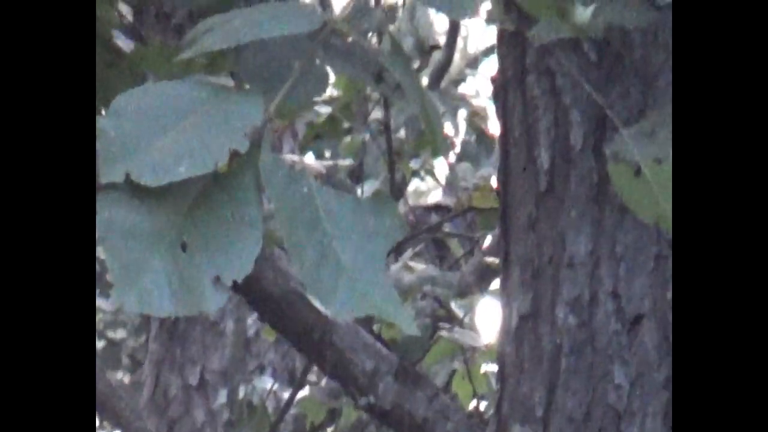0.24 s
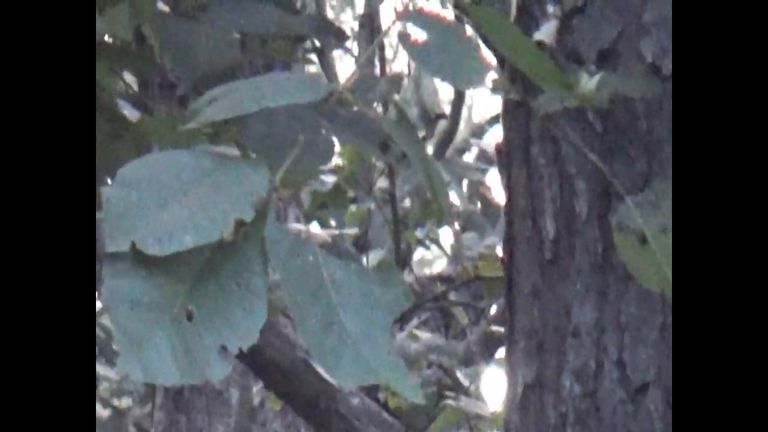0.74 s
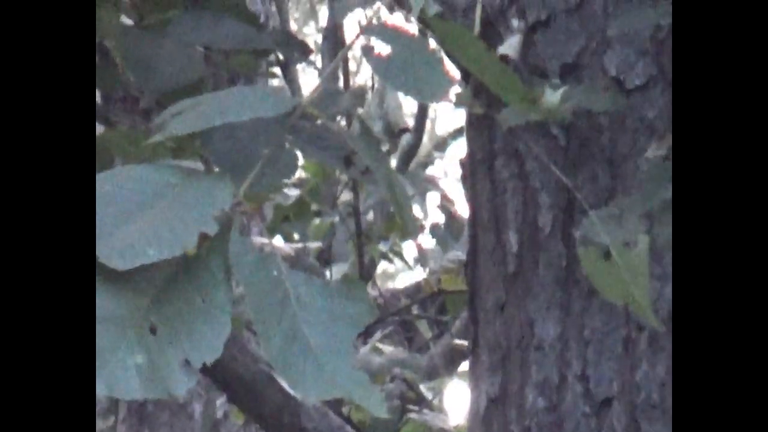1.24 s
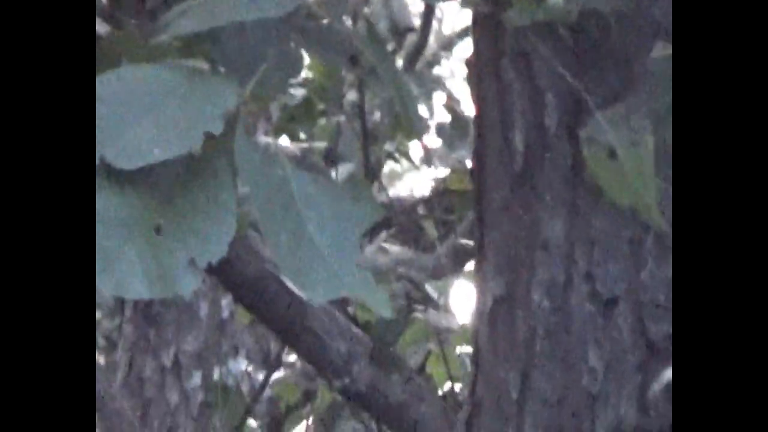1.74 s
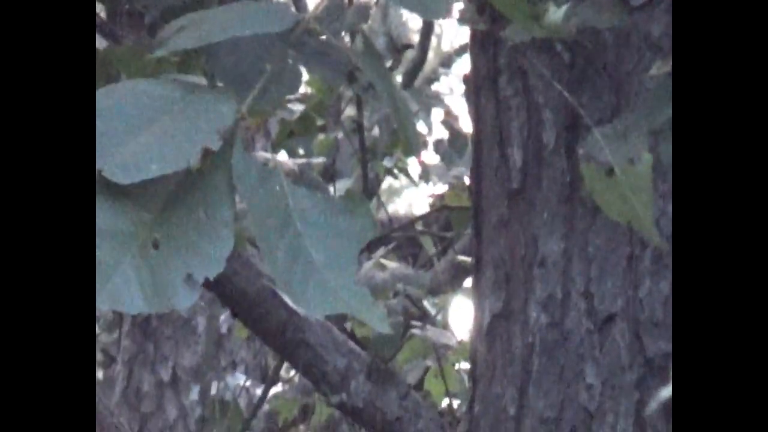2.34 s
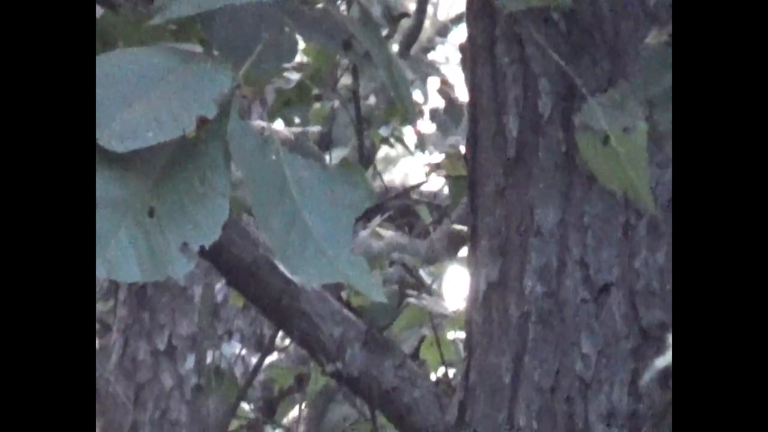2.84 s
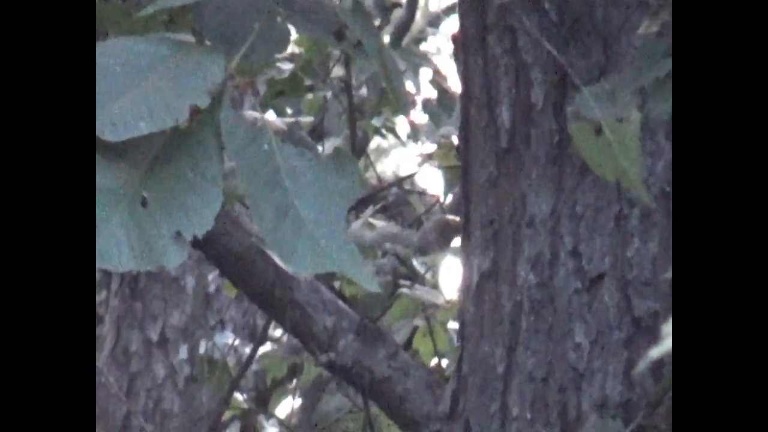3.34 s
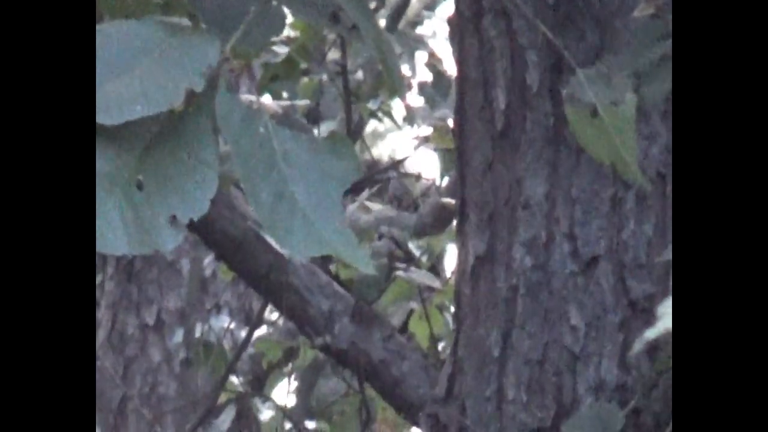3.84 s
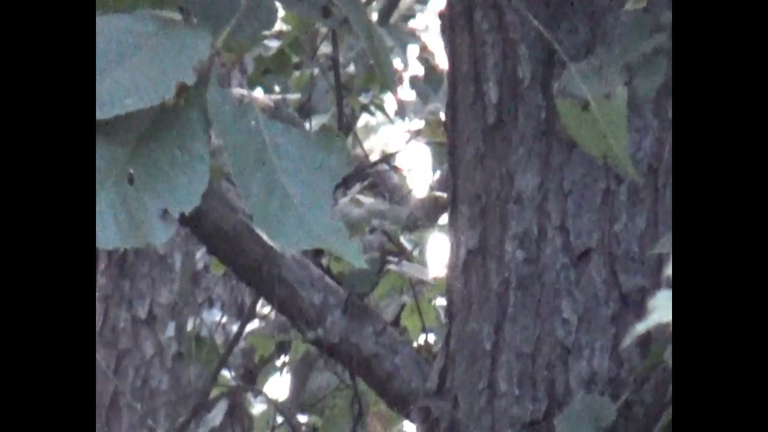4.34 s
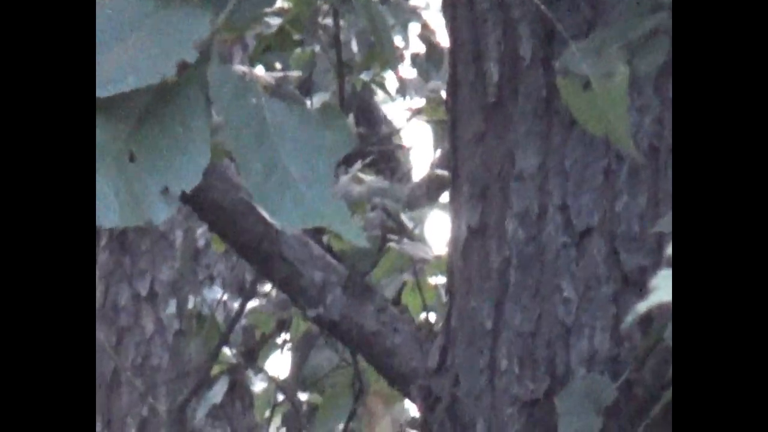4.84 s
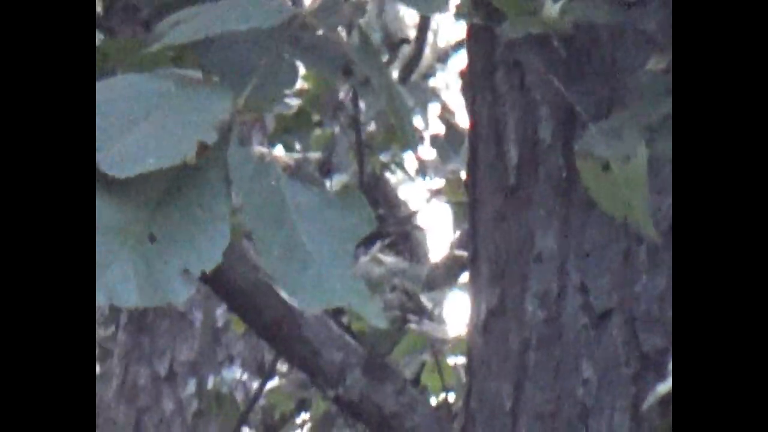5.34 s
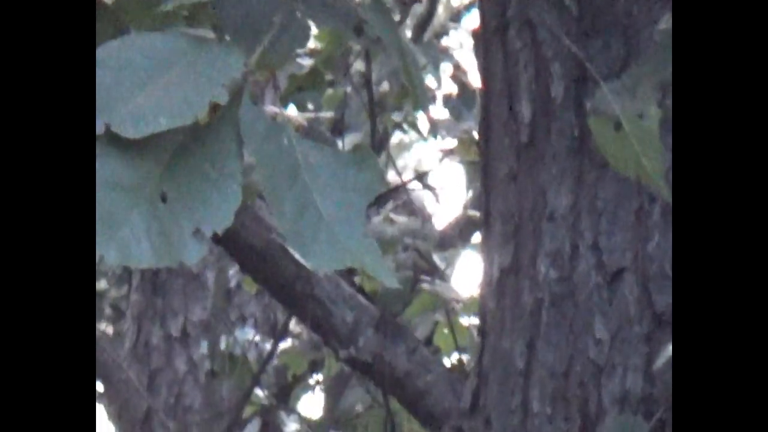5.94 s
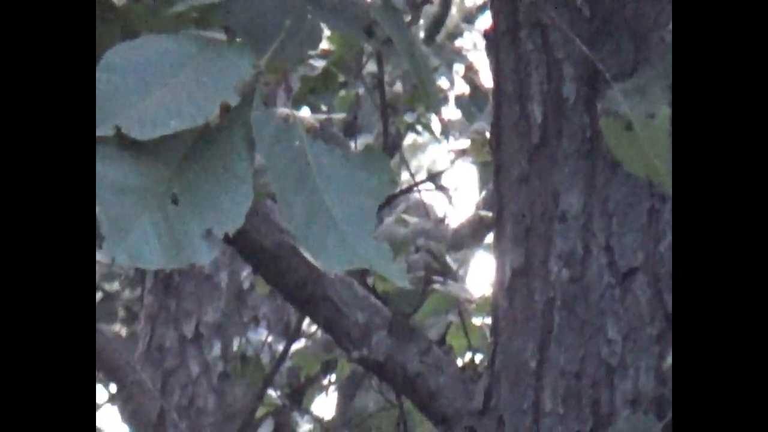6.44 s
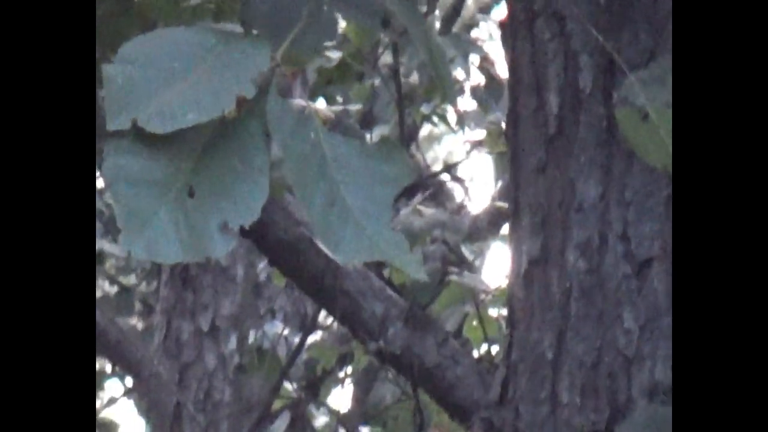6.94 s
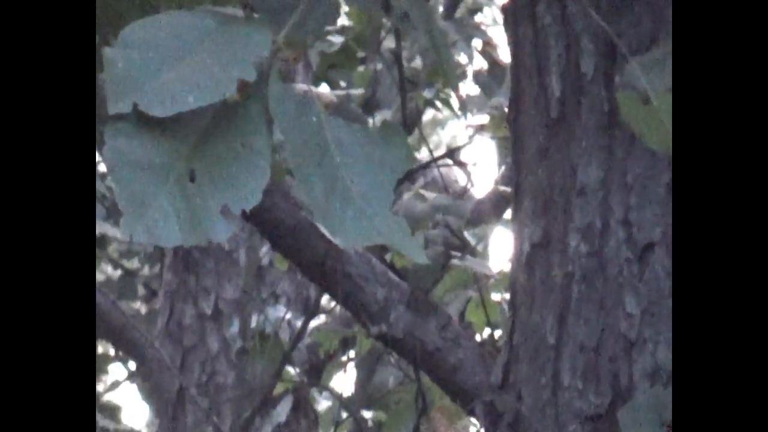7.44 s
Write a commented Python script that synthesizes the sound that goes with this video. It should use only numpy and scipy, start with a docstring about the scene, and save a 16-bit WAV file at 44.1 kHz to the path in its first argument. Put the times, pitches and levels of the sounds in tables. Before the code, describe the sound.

From the start, two near cicadas, a little right of centre, sing shrill whistled pulses around 6.5 kHz, each over twenty syllables a second, so their rhythms beat in and out of step. Leaves and trunks blur them slightly. One stops at about 1.9 s, the other at 2.0 s, uncovering a softer, distant shimmering chorus, weaker cicadas and thin high trills. At 2.6 s one near singer returns soft and slightly flat, the second at 3.0 s; both gradually swell and stay to the end. Beneath lie a quiet airy hush, a slowly growing faint buzz, hollow swells around 1-2 and 4.4-5.1 s, and a very faint low hum near 3 s. A far bird whistles softly around 1.5, 3.1, 4.1 and 6 s, with echo. Between 6.6 and 6.95 s, several tiny dry crunches and clicks scuff close to the stereo microphone.

```python
"""A wood full of singing cicadas. The two nearest sing about 22 and 23.5 arching whistled syllables a second,
so they drift in and out of step; both break off near two seconds and swell back in.
Behind them are weaker cicadas, trills, a buzz, a far bird's whistles, an outdoor hush and brief rustles close by.
The insects, bird and hum are sine tones with moving pitch; the hush, buzz and rustles are shaped noise.
Echoes come from dying noise tails that imitate trunks and leaves."""
import sys
import numpy as np
from scipy import signal
from scipy.fft import rfft, irfft
from scipy.io import wavfile

SR = 44100
rng = np.random.default_rng(int(sys.argv[2]) if len(sys.argv) > 2 else 0)


def master_out(mix):
    """Clip the mix to full scale and print it as 16-bit PCM to the path in sys.argv[1]."""
    frames = np.transpose(np.atleast_2d(mix))
    ceiling = np.clip(frames, -1, 1)
    pcm = np.round(ceiling * 32767).astype(np.int16)
    wavfile.write(sys.argv[1], SR, pcm)


N = 339570
TIME = np.arange(N) / SR   # seconds

# One cicada syllable each, around its crest: cycle_share, pitch_offset_hz, level_db
SLOW_SYLLABLE = [(-.5, -800, -32), (-.27, -480, -21), (-.19, -240, -6), (-.11, -40, -1.5), (0, 50, -.3),
                 (.1, -30, -.5), (.19, -310, -2), (.25, -600, -11), (.32, -950, -25), (.5, -1200, -36)]
QUICK_SYLLABLE = [(-.5, -900, -60), (-.28, -600, -16), (-.19, -380, -8), (-.1, -110, -6), (0, 40, -0.5),
                  (.1, -110, -2), (0.19, -450, -10), (0.259, -760, -32), (0.34, -1000, -21.5),
                  (0.5, -1200, -26.5)]
DEEP_SYLLABLE = [(-.5, -650, -22), (-.25, -320, -13), (-.12, -90, -2), (0, 10, 0), (.12, -70, -.5),
                 (.22, -330, -1), (.32, -660, -9), (.42, -900, -24)]
HIGH_SYLLABLE = [(-.5, -700, -40), (-.13, -450, -20), (-.06, -130, -4), (0, 0, 0), (.06, -130, -3),
                 (.13, -450, -17), (.5, -700, -40)]
# The same columns; this syllable has two humps, the first ending in a long fall
DRAWLING_SYLLABLE = [(-.5, -250, -3), (-.38, -500, -12), (-.2, -400, -20), (-.08, -80, -5), (0, 0, -3),
                     (.08, -150, -1), (.16, -550, 0), (.22, -750, -18), (.36, -400, -15), (.5, -250, -3)]
# Cicada phrases (a negative start is already under way): singer_name, start_s, stop_s, crest_s (time of
# one syllable's crest), syllables_per_s, tempo_loss_per_s, full_crest_pitch_hz, full_level_db
PHRASES = [ ("slow", -9, 2.012, .0277, 22.0, .113, 6700, -34.5),
           ("slow", 3.03, 9, 3.2207, 21.97, .016, 6785, -35.2),
           ("quick", -1.5, 1.89, .0337, 23.492, .242, 6600, -33.5),
           ("quick", 2.62, 9, 2.688, 23.62, .08, 6560, -35.1),
           ("deep", -9, 9, .0235, 20.96, 0, 5935, -50.6), ("farther", -9, 9, .002, 22.62, 0, 6370, -48.5),
           ("drawling", -9, 9, .092, 5.846, 0, 6100, -56), ("high", -9, 3.1, .044, 7.434, 0, 7350, -59),
           ("high", 4.5, 9, 5.03, 7.44, 0, 7350, -60), ]
# Thin far trills: start_s, stop_s, first_pitch_hz, rise_hz_per_s, level_db
TRILLS = [(0, 2.72, 7590, 15, -64), (3.6, 7.8, 7830, 12, -75.5)]
# Colour of the outdoor hush: pitch_hz, density_db (relative, per Hz)
HUSH_COLOUR = [(25, -9.5), (90, 0.5), (220, 1.5), (400, 0), (600, 3), (850, 2), (1050, -3.5), (1700, -6),
               (3200, -7.5), (4700, -10.5), (7800, -7.5), (9500, -15.5), (12000, -12), (15500, -17.5)]
# Slow rise and fall of the hush, used relative to its mean: time_s, level_db
HUSH_LEVEL = [(0.0, -62.5), (1.69, -62), (2.97, -64.5), (5.13, -63), (6.4, -62)]
# Narrow bands of background noise: pitch_hz, width_hz, level_db
DRONES = [(209.3, 6.4, -76.5), (687.7, 56, -66), (761, 59, -73.5), (884, 31, -69.5)]
# A hollow far sound that comes and goes: start_s, stop_s, level_db
SWELLS = [(0, .25, -72), (0.994, 1.923, -63), (4.376, 5.12, -62.5), (5.777, 6.155, -67), (7.4, 7.616, -61)]
# Far bird whistles: start_s, length_s, first_pitch_hz, top_pitch_hz, level_db
WHISTLES = [(1.519, 0.39, 4130, 4280, -61.5), (3.083, 0.11, 4280, 4400, -70),
            (3.183, 0.25, 4380, 4430, -63.5), (4.099, 0.45, 4160, 4310, -63),
            (5.847, 0.276, 4280, 4363, -69), (6.109, .25, 4360, 4380, -64.5)]
# Rustles: peak_s, rise_s, decay_s, thud_db, crunch_db, hiss_db
RUSTLES = [(6.619, .0073, .012, -67, -44.5, -60), (6.638, 0.012, 0.037, -74, -58, -58),
           (6.729, 0.0042, 0.024, -58, -43, -59), (6.75, 0.0055, 0.023, -57, -66, -55.5),
           (6.892, .0021, 0.0079, -48, -56, -52.5), (6.92, .016, .035, -73, -62, -58)]
# How alike noise is in the two ears: pitch_hz, likeness_share (1 is identical)
LIKENESS = [(30, 0.99), (130, 0.94), (290, 0.6), (650, 0.49), (1300, 0.15), (3000, 0.42), (6000, 0.68),
            (8500, 1)]
# Narrowing of the stereo image in the treble: pitch_hz, side_level_db
STEREO_WIDTH = [(7000, 0), (7600, -2), (8600, -5)]

SLOW_PAN_DB, QUICK_PAN_DB = -5.7, -3.8   # left minus right
SWITCH_S = .008   # a singer's voice switches on and off this fast
LEAVES_T60_S = .045   # time for the nearest leaves' scatter to fall 60 dB
BUZZ_DB, BUZZ_GROWTH_DB_PER_S = -77, 1.18
HUSH_DB = -56.5   # mean of the hush's level in dB
SWELL_ATTACK_S, SWELL_RELEASE_S, SWELL_REST_DB = 0.13, 0.15, -70
HUM_START_S, HUM_STOP_S, HUM_FADE_S = 2.45, 3.33, .4
HUM_HZ, HUM_RISE_HZ_PER_S, HUM_DB = 137, 3.5, -70.5
CUTOFF_HZ = 15760


def from_db(db):
    """Turn decibels into a gain."""
    return 10 ** (np.asarray(db) / 20)


def rms_one(x):
    """Scale to unit power."""
    return x / np.sqrt(np.mean(x ** 2) + 1e-20)


def read(rows, at=TIME):
    """Read every column of a table, joined by straight lines along the first column."""
    first, *columns = np.transpose(rows)
    return [np.interp(at, first, column) for column in columns]


def drift(rate_hz):
    """Smooth random wander of spread 1: noise with its fast changes weakened."""
    hz = np.arange(N // 2 + 1) * SR / N
    spectrum = rfft(rng.standard_normal(N))
    return rms_one(irfft(spectrum / (1 + (hz / rate_hz) ** 2), N))


def gate(start, stop, attack_s, release_s):
    """Rise from the start, hold, and fall after the stop."""
    rise = (TIME - start) / attack_s
    fall = 1 - (TIME - stop) / release_s
    return np.clip(np.minimum(rise, fall), 0, 1)


def noise(gain_at):
    """Stereo noise of a given colour and unit power; a shared part makes the two ears alike."""
    hz = np.arange(1, N // 2 + 2) * SR / N
    alike = np.clip(read(LIKENESS, hz)[0], 0, 1)
    shares = np.sqrt([1 + alike, 1 - alike])
    spectra = rfft(rng.standard_normal((2, N))) * gain_at(hz) * shares
    mid, side = irfft(spectra, N)
    return rms_one(mid + side * np.array([[1], [-1]]))


def band(centre_hz, width_hz):
    """Noise in one rounded band of pitches."""
    return noise(lambda hz: 1 / (1 + ((hz - centre_hz) / width_hz * 2) ** 4) ** .5)


def place(x, pan_db):
    """Place a sound by its left minus right level."""
    return x * from_db([[pan_db / 2], [-pan_db / 2]])


def wood(x, t60):
    """Scattering by trunks and leaves: a dense dying tail, different in each ear; foliage soaks up the top."""
    age = TIME[:SR]
    envelope = from_db(-60 * age / t60) * (1 - np.exp(-age / 0.014))
    tail = rng.standard_normal((2, SR)) * envelope
    tail = tail / np.sqrt(np.sum(tail ** 2, axis=1, keepdims=True))
    tail = signal.sosfilt(signal.butter(2, 9000, fs=SR, output="sos"), tail)
    return signal.fftconvolve(x[None], tail, axes=1)[:, :N]


def cicada(strokes, crest_hz, syllable, octave_db, resonance_db=0, upper_hz=12000, upper_width_hz=3000):
    """An abdomen whose pitch and loudness arch with every muscle stroke.

    Its main resonance lifts the basic tone, and an upper one lifts the octave.
    """
    cycle_share = (strokes + .5) % 1 - .5
    bend_hz, stroke_db = read(syllable, cycle_share)
    hz = crest_hz + bend_hz + 25 * drift(117.2)
    phase = 2 * np.pi * np.cumsum(hz) / SR
    roughness = 1 + 0.13 * drift(480)
    loudness = from_db(stroke_db + 1.06 * drift(2.1)) * roughness
    octave_gain = from_db(octave_db) / (1 + (2 * (2 * hz - upper_hz) / upper_width_hz) ** 2)
    tone = from_db(resonance_db) * np.sin(phase) + octave_gain * np.sin(2 * phase)
    return np.sqrt(2) * loudness * tone


def singer(name, syllable, octave_db, upper_hz=12000, upper_width_hz=3000,
           warm_up_s=0.46, flat_hz=200, soft_db=12):
    """Each phrase starts flat and soft and warms up; a tiring insect may slow a little."""
    out = 0
    for who, start, stop, crest_s, tempo, slowing, full_hz, full_db in PHRASES:
        if who == name:
            age = TIME - crest_s
            strokes = tempo * age - slowing * age ** 2 / 2
            slack = np.exp(-np.maximum(TIME - start, 0) / warm_up_s)   # 1 is cold, 0 fully warm
            crest_hz = full_hz - flat_hz * slack
            resonance_db = -soft_db * slack ** 2
            voice = cicada(strokes, crest_hz, syllable, octave_db, resonance_db, upper_hz, upper_width_hz)
            out = out + from_db(full_db) * gate(start, stop - SWITCH_S, SWITCH_S, SWITCH_S) * voice
    return out


def near_cicadas():
    """Two loud singers to the right and weaker ones, with scatter from the nearest leaves and the trees."""
    slow = singer("slow", SLOW_SYLLABLE, octave_db=-36, upper_hz=13450, upper_width_hz=350,
                  warm_up_s=2.4, flat_hz=299.3, soft_db=13.5)
    quick = singer("quick", QUICK_SYLLABLE, octave_db=-23.5, upper_hz=12330, upper_width_hz=690,
                   warm_up_s=1.3, flat_hz=180, soft_db=10.0)
    deep = singer("deep", DEEP_SYLLABLE, octave_db=-18.5)
    deep = deep + singer("drawling", DRAWLING_SYLLABLE, octave_db=-11.5)
    others = singer("farther", QUICK_SYLLABLE, octave_db=-27)
    others = others + singer("high", HIGH_SYLLABLE, octave_db=-50)
    direct = place(slow, SLOW_PAN_DB) + place(quick, QUICK_PAN_DB)
    direct = direct + place(deep, pan_db=3.5) + place(others, pan_db=-2)
    leaves = place(from_db(-8.5) * wood(slow + quick, t60=LEAVES_T60_S), pan_db=2.5)
    trees = from_db(-19) * wood(slow + quick, t60=.25)
    trees = trees + from_db(-9) * wood(deep, t60=.4) + from_db(-1) * wood(others, t60=.4)
    return direct + leaves + trees


def far_chorus(count=4):
    """Distant cicadas at random tempos, blurred by the wood, with noise bands for a surging sizzle."""
    voices = 0
    crests_hz = np.linspace(5850, 6400, count)
    timings = rng.uniform([20, 0], [24, 1], (count, 2))   # syllables per s, starting share of a cycle
    for crest_hz, (tempo, offset) in zip(crests_hz, timings):
        voices = voices + cicada(offset + tempo * TIME, crest_hz, QUICK_SYLLABLE, octave_db=-24)
    chorus = from_db(-56.0) * rms_one(voices + wood(voices, t60=0.36))
    surge = from_db(-63 + 3.5 * drift(15)) * band(5490, 220)
    high_sizzle = from_db(-75.5) * band(10600, 1300)
    return chorus + surge + high_sizzle


def trill(hz, waver_hz, flutter_db):
    """A tone that flutters in level and pitch, with a little scatter from the wood."""
    phase = 2 * np.pi * np.cumsum(hz + waver_hz * drift(64)) / SR
    tone = np.sin(phase) * from_db(flutter_db * drift(45))
    return tone + 0.18 * wood(tone, t60=0.13)


def far_insects():
    """High trills that creep up in pitch, and a lower noise-band buzz that slowly grows."""
    out = from_db(BUZZ_DB + BUZZ_GROWTH_DB_PER_S * TIME) * band(2460, 146)
    for start, stop, first_hz, rise, level_db in TRILLS:
        tone = trill(first_hz + rise * (TIME - start), waver_hz=30.5, flutter_db=4.5)
        out = out + from_db(level_db) * gate(start, stop, attack_s=0.36, release_s=.04) * tone
    return out


def outdoor_hush():
    """Broad coloured noise that slowly rises and falls."""
    colour_hz, colour_db = np.transpose(HUSH_COLOUR)
    hush = noise(lambda hz: from_db(np.interp(np.log(hz), np.log(colour_hz), colour_db)))
    level_db, = read(HUSH_LEVEL)
    return from_db(HUSH_DB + level_db - level_db.mean()) * hush


def narrow_drones():
    """Steady narrow bands of noise, a little to the left."""
    drones = sum(from_db(level_db) * band(hz, width) for hz, width, level_db in DRONES)
    return place(drones, pan_db=2.5)


def hollow_swells():
    """A hollow noise band that swells above a faint resting level."""
    swelling = sum(from_db(level_db) * gate(start, stop, SWELL_ATTACK_S, SWELL_RELEASE_S)
                   for start, stop, level_db in SWELLS)
    level = np.hypot(swelling, from_db(SWELL_REST_DB)) * from_db(0.9 * drift(15))
    hollow = band(1272, 148) + 0.73 * band(880, 1800)
    return place(level * hollow, pan_db=4.0)


def passing_hum():
    """A low fluttering tone that fades in and out as its pitch creeps up."""
    hz = HUM_HZ + HUM_RISE_HZ_PER_S * (TIME - HUM_START_S)
    tone = trill(hz, waver_hz=2.43, flutter_db=6.0)
    return from_db(HUM_DB) * gate(HUM_START_S, HUM_STOP_S, HUM_FADE_S, HUM_FADE_S) * tone


def bird():
    """Soft wavering whistles that slide up and hold, with a long echo from the wood."""
    out = np.zeros(N)
    waver_hz = 50 * drift(142)
    for start, length, first_hz, top_hz, level_db in WHISTLES:
        along = np.clip((TIME - start) / length, 0, 1)
        hz = top_hz + (first_hz - top_hz) * np.exp(-8 * along) + waver_hz
        loudness = np.minimum(1, 18 * along) * np.sqrt(1 - along)   # firm start, fading end
        out += from_db(level_db) * loudness * np.sin(2 * np.pi * np.cumsum(hz) / SR)
    return 1.17 * out + wood(out, t60=0.81)


def rustles():
    """Brief scuffs close by: noise bands make a dull thud, a grainy crunch and a crisp hiss."""
    force = 0
    for peak_s, rise, decay, *levels_db in RUSTLES:
        shape = np.exp(-np.maximum((peak_s - TIME) / rise, (TIME - peak_s) / decay))
        force = force + np.outer(from_db(levels_db), shape)
    grains = rms_one(1 + .55 * np.tanh(1.5 * drift(700)))   # dry fibres catch and let go
    thud, crunch, hiss = force * grains
    crisp = 0.87 * band(4000, 2200) + 1.18 * band(8740, 3200)
    scuffs = thud * band(176, 100) + crunch * band(1414, 1700) + hiss * crisp
    return scuffs + from_db(-7) * wood(scuffs.mean(axis=0), t60=0.86)


def scene():
    """All the sounds of the wood."""
    insects = near_cicadas() + far_chorus() + far_insects()
    background = outdoor_hush() + narrow_drones() + hollow_swells() + passing_hum()
    return insects + background + bird() + rustles()


def record(dry):
    """The stereo image narrows in the treble and the top is cut steeply."""
    mid, side = (dry[0] + dry[1]) / 2, (dry[0] - dry[1]) / 2
    side_db, = read(STEREO_WIDTH, np.arange(N // 2 + 1) * SR / N)
    side = irfft(rfft(side) * from_db(side_db), N)
    top_cut = signal.ellip(12, .1, 70, CUTOFF_HZ, fs=SR, output="sos")
    return signal.sosfilt(top_cut, [mid + side, mid - side])


dry = scene()
out = record(dry)
master_out(out)
```